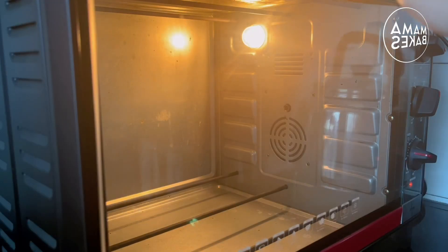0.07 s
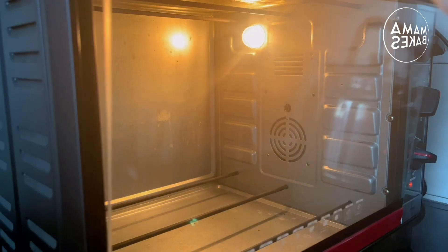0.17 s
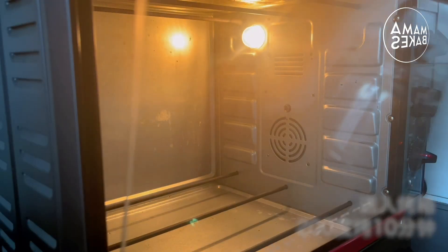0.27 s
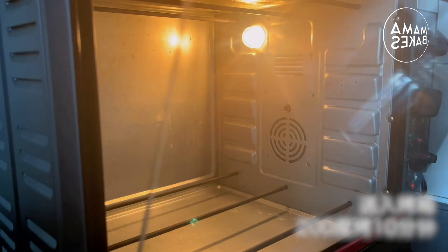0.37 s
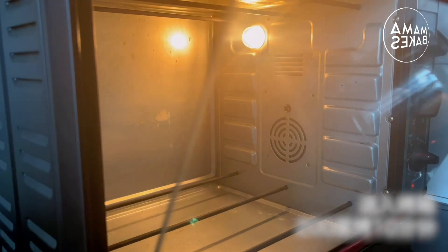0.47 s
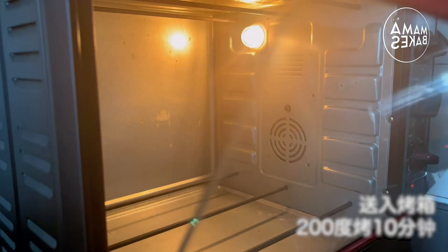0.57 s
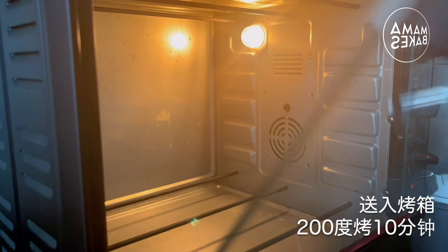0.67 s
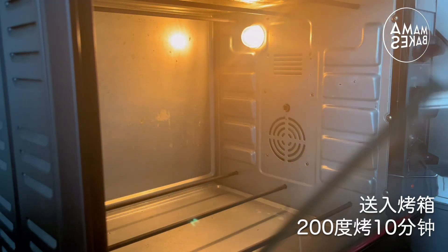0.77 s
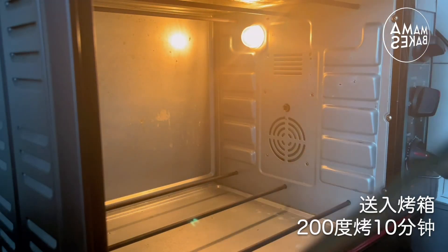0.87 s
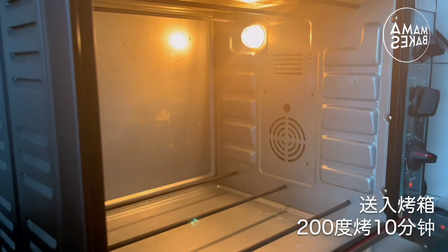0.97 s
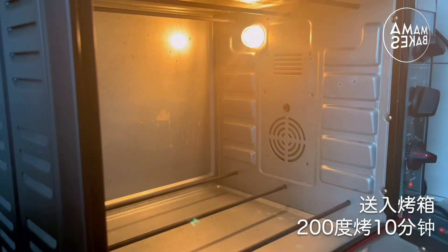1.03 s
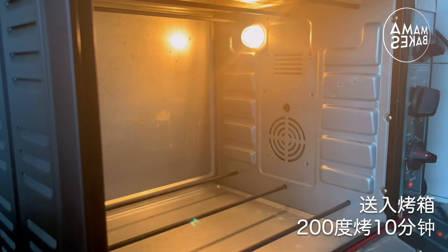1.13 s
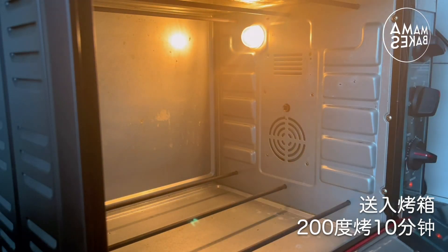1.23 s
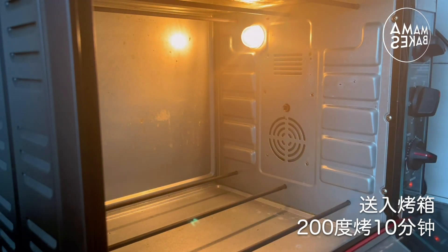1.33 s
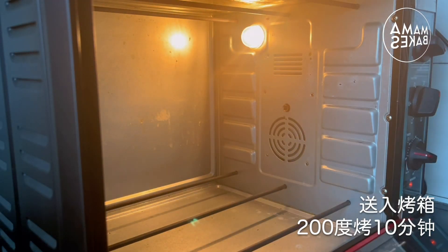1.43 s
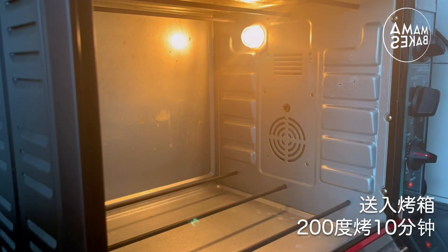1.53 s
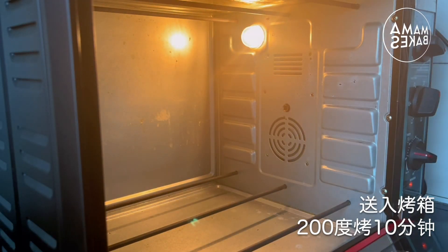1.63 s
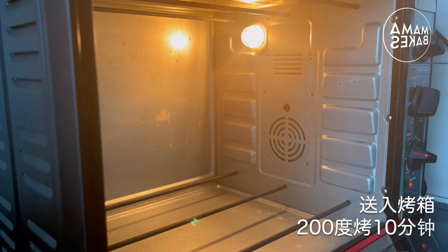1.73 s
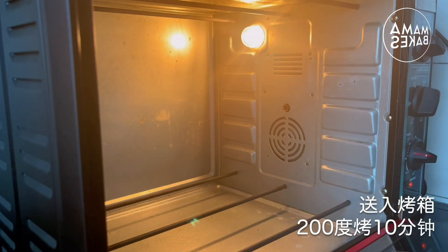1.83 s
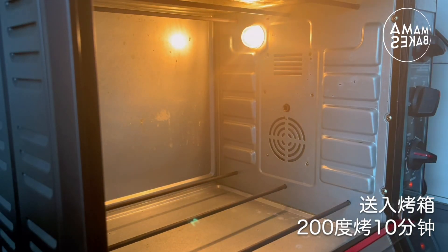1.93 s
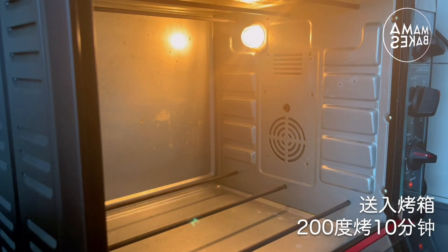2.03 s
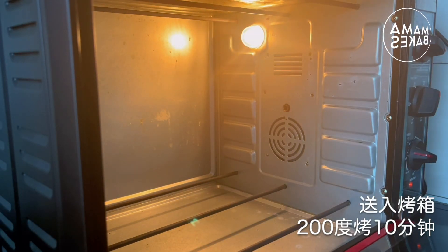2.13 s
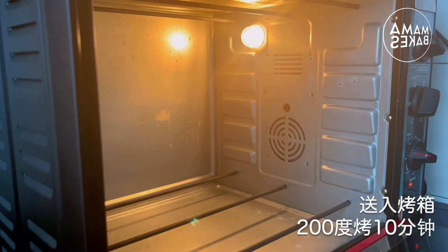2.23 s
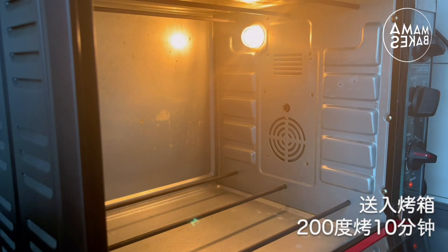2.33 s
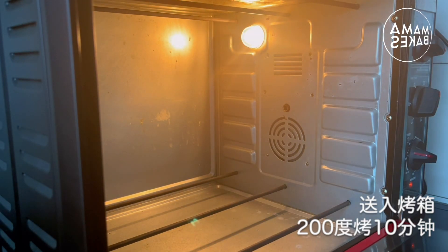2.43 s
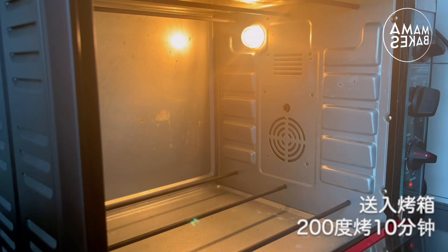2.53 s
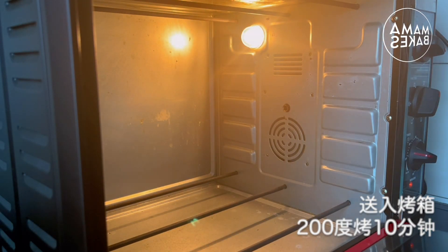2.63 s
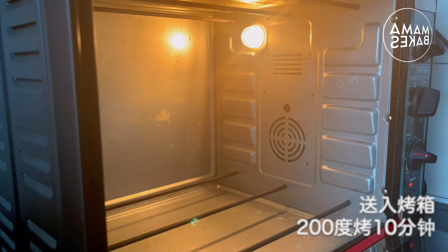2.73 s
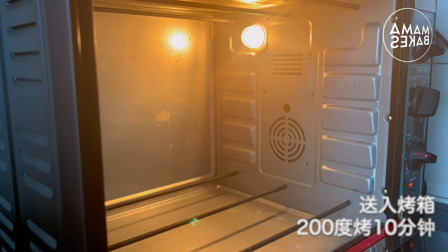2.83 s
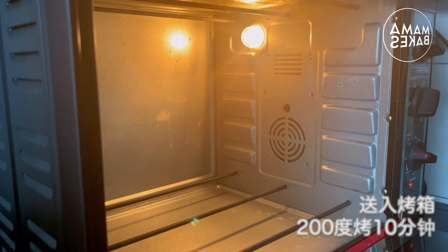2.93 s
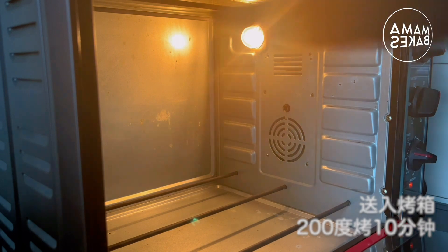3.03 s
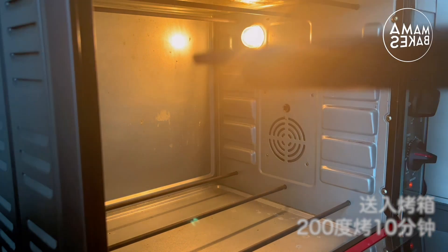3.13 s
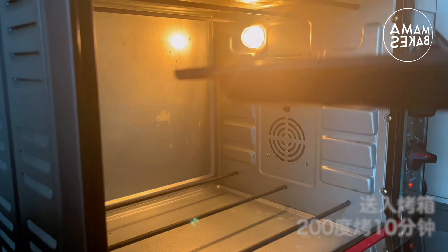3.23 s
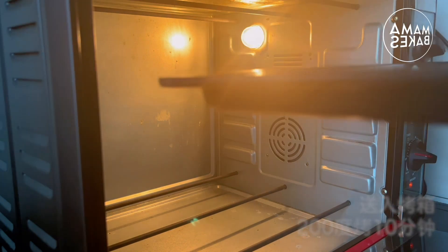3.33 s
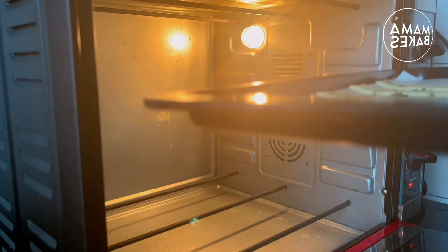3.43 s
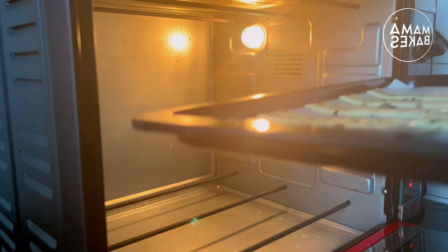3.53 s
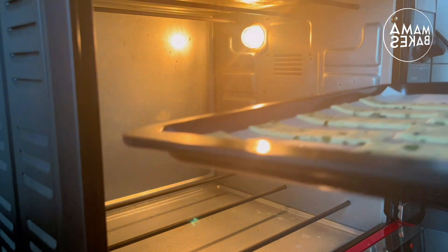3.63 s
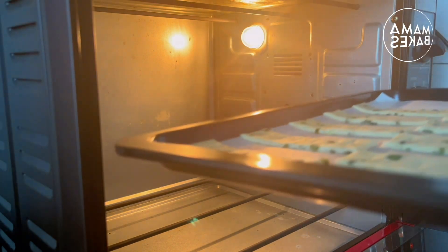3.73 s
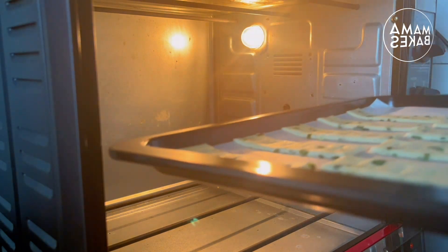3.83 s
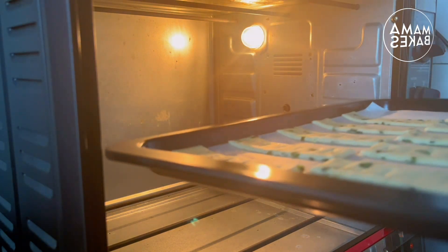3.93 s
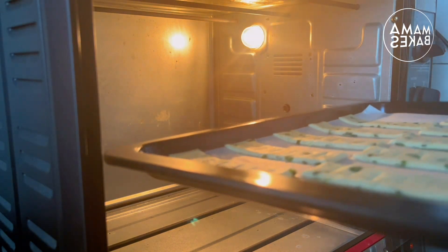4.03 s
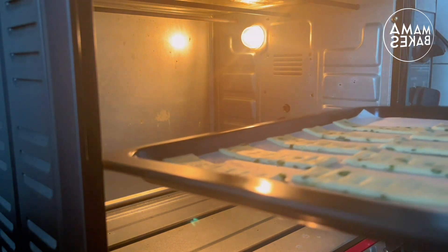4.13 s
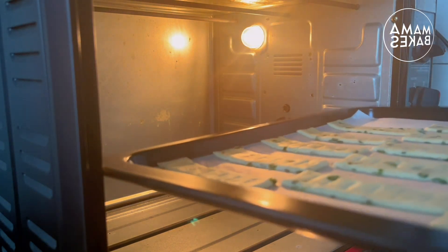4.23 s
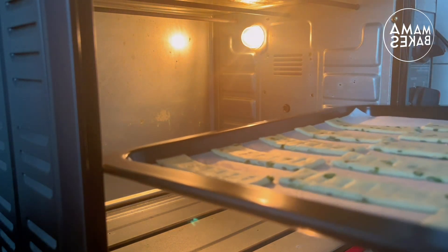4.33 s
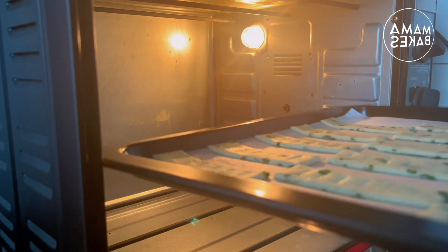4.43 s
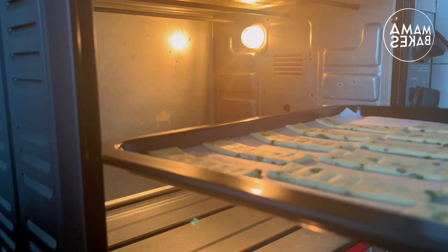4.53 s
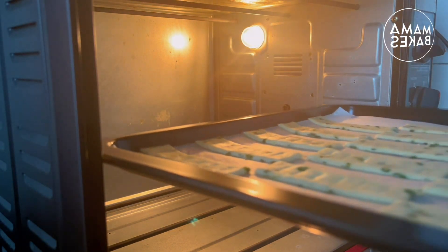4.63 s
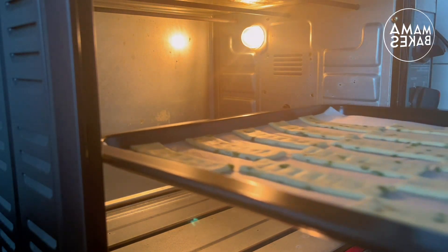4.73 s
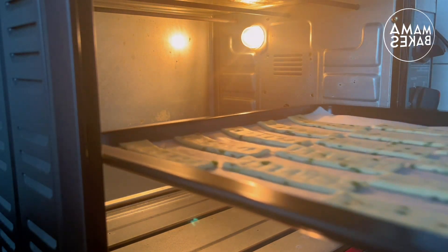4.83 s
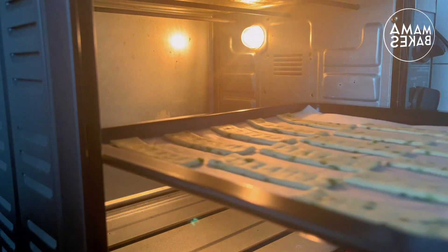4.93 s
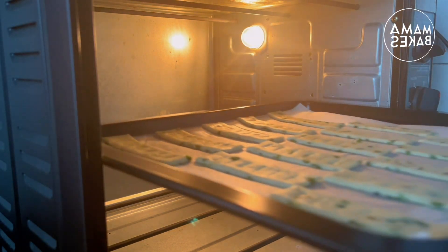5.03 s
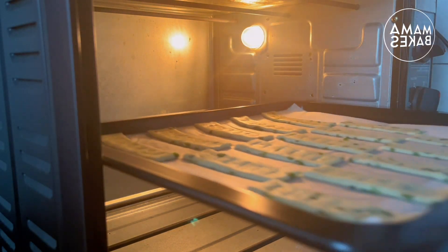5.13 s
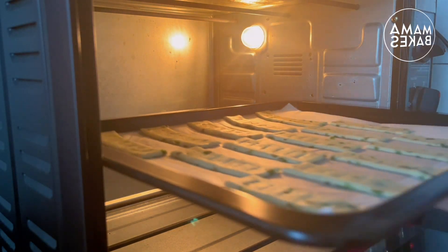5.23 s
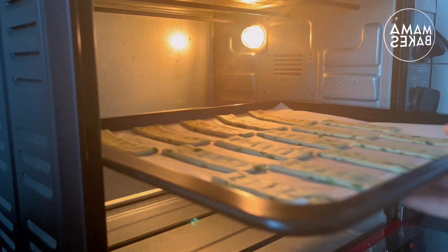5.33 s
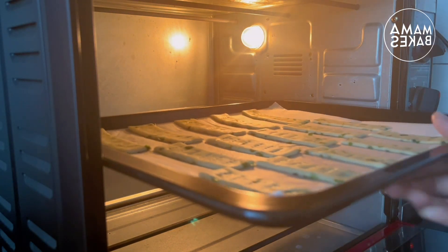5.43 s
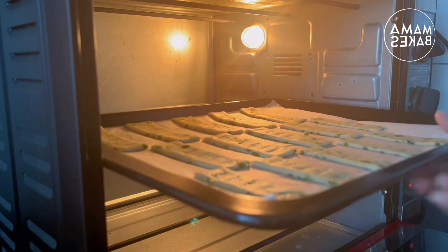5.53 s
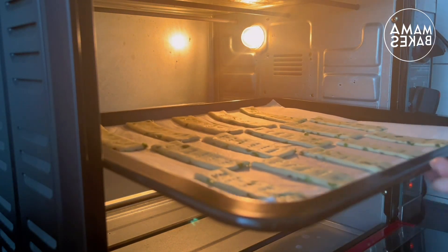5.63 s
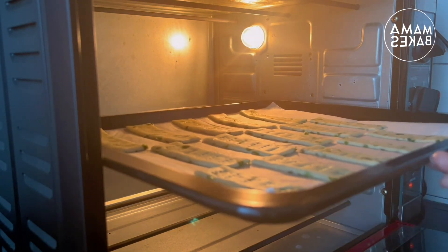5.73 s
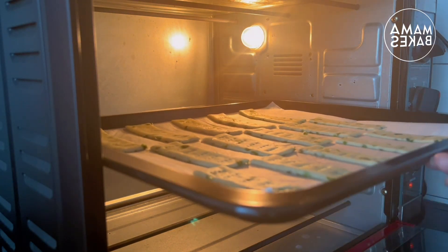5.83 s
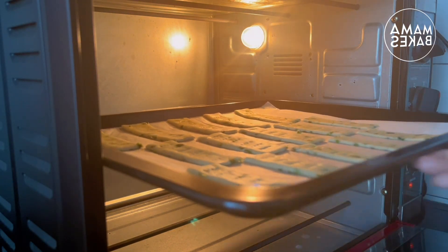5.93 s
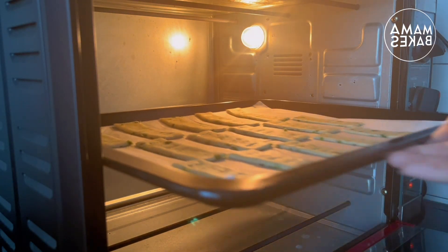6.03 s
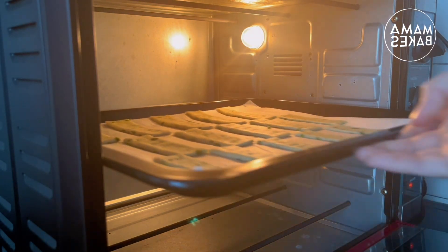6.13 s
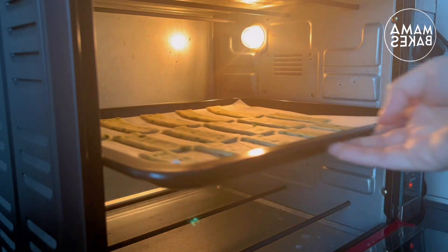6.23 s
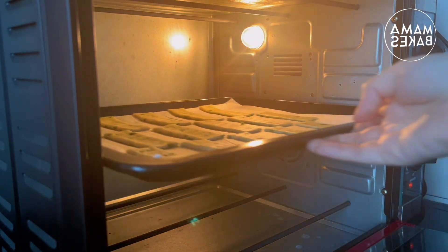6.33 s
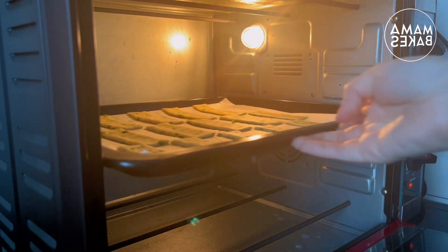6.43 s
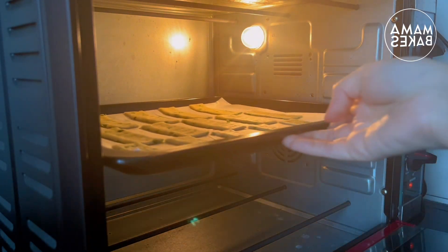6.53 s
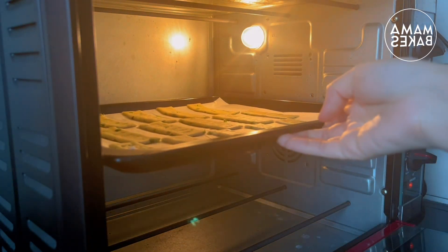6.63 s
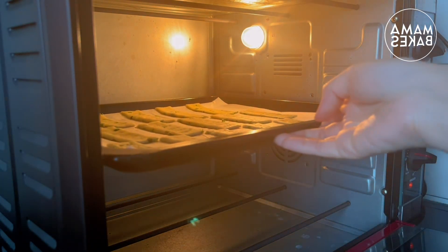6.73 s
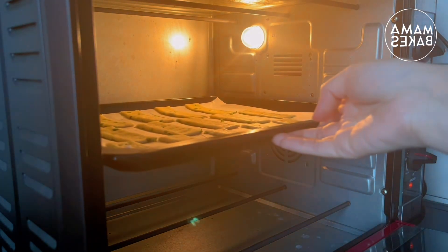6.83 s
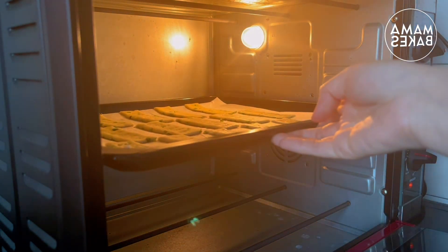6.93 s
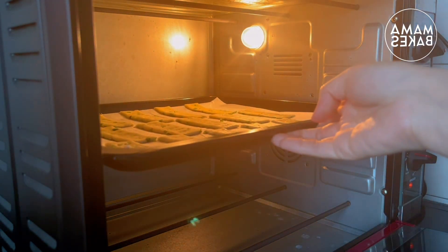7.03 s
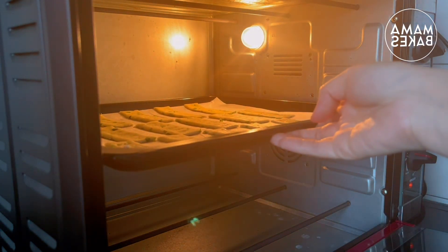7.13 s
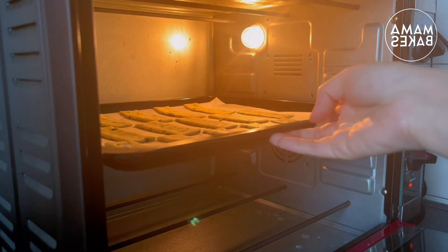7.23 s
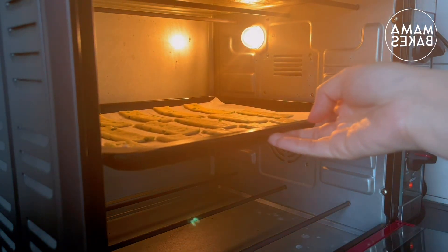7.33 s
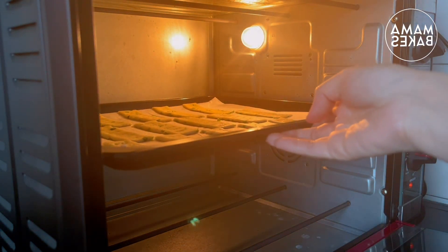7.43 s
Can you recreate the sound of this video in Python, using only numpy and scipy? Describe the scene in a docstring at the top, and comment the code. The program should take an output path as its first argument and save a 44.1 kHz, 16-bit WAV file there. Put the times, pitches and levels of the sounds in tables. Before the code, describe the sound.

In a hard-walled kitchen a clockwork timer ticks steadily while a small oven door clunks open, then a steel tray clatters and scrapes along its rails.

```python
"""A motor hums over room air and a clockwork timer ticks and tocks, four beats a second, in a hard-walled kitchen.
The glass door of a small electric oven drops open in steps: each contact excites steel modes and dense echoes.
A steel tray then lands on the side rails, scrapes in as grains of coloured noise and knocks against them.
The hum is a wavering sine with steady tones; each timer beat is three noise bursts answered by the kitchen."""
import sys
import numpy as np
from scipy import signal
from scipy.fft import rfft, irfft, next_fast_len
from scipy.io import wavfile
from scipy.ndimage import uniform_filter1d, map_coordinates

SR = 44100
rng = np.random.default_rng(int(sys.argv[2]) if len(sys.argv) > 2 else 0)


def store_pcm(level_fs):
    """Save levels as 16-bit WAV."""
    pcm = np.round(np.clip(level_fs, -1, 1) * 32767).astype(np.int16)
    wavfile.write(sys.argv[1], SR, np.atleast_2d(pcm).T)


N = 330309

# Level of the motor's hum. Each row: time in seconds, level in dB.
HUM_LEVEL = [(0.0, -37.5), (0.1, -43), (0.29, -44.5), (0.44, -39), (0.6, -48), (0.71, -39), (1.06, -49),
             (1.11, -43.5), (1.27, -53), (4.25, -53.5), (4.32, -43), (4.42, -52), (4.55, -41.5),
             (4.73, -54), (4.84, -48), (4.96, -52), (5.09, -79), (5.19, -55), (5.36, -47), (5.44, -55),
             (5.94, -60.5), (6.09, -77), (6.2, -64), (6.28, -78.5), (7.49, -79.5)]
# Steady faint tones. Each row: frequency in Hz, level in dB rms.
STEADY_TONES = [(98, -99), (135.5, -95), (200, -87.5), (400, -106.5), (1199, -91.5)]
# Spectral density of the room air before its level curve. Each row: frequency in Hz, level in dB per Hz.
AIR_COLOUR = [(20, -110), (60, -116), (90, -116), (180, -116), (300, -125), (550, -122), (1200, -124),
              (2500, -131), (4500, -134), (4900, -124), (6000, -126), (7000, -140), (11000, -134),
              (13000, -150)]
# Level added to the room air. Each row: time in seconds, gain in dB.
AIR_LEVEL = [(0, 8.5), (2.4, 5.5), (2.55, 14.5), (2.95, 10.5), (3.1, 6.5), (6, 10.5), (6.5, 6.5), (7.49, 6)]
# Decay of the kitchen's echoes. Each row: frequency in Hz, time to fall by 60 dB in seconds.
KITCHEN_DECAY = [(100, 1), (300, 0.5), (800, 0.94), (2000, 0.5), (5000, 0.27), (12000, 0.2)]
# Correlation of left and right where noises are spread. Each row: frequency in Hz, likeness from 0 to 1.
LIKENESS = [(60, 0.55), (150, 1), (380, 0.67), (950, 0.13), (2380, 0.61), (5980, 0.13), (12000, .2)]

# Relative spectrum of the timer's click. Each row: frequency in Hz, level in dB.
CLICK_COLOUR = [(1530, -63), (2600, -35.5), (2840, -39), (3150, -18.5), (4610, -23), (4960, -10.5),
                (7470, -9), (7980, 0), (8530, -16), (9450, -7.5), (11700, -13), (15000, -47.5)]
# Two overlapping stretches of the timer's beat. Each row: first tick in seconds, tick to tick in seconds,
# number of ticks, level in dB before a common gain, drift in dB per second.
BEATS = [(0.177, .4958, 6, -42, 0.94), (2.4746, .4943, 11, -44.5, -0.14)]
TOCK_DELAY_S, TOCK_DB = 0.2375, -6  # the tock relative to its tick
TICK_BODY_DB, TOCK_BODY_DB = -6.5, -13.5  # added to the click's colour below 8 kHz

# Relative spectrum of rim on rail, before its tilt. Each row: frequency in Hz, level in dB.
RASP_COLOUR = [(240, -64), (400, -36), (512, -13.5), (723, -17), (983, -7.5), (1290, -6), (2330, -3),
               (6970, -14.5), (7600, -17.5), (9880, -58.5), (16700, -120)]
# Relative spectrum of the high friction hiss. Each row: frequency in Hz, level in dB.
FIZZ_COLOUR = [(7000, -31.5), (8000, -6.5), (12100, -0.5), (12500, -32), (14300, -27), (15000, -59.5)]
# Relative spectrum of the cabinet's rumble. Each row: frequency in Hz, level in dB.
RUMBLE_COLOUR = [(70, -42), (100, -15.5), (147, 0.5), (170, -16), (190, -35)]
# Strokes of the tray on the rails. Each row: start in seconds, rise in seconds, hold in seconds,
# rasp level in dB, fizz level in dB, rumble level in dB, rasp centre in Hz.
STROKES = [(4.175, .1, 0.014, -48, -64.5, -39, 1750), (4.33, .06, 0.091, -41, -49.5, -54.5, 2200),
           (4.6, .11, 0.05, -42.5, -45.5, -55.5, 2860), (4.723, 0.028, 0.22, -41.5, -50, -51.5, 1615),
           (5.052, 0.079, 0.067, -55.5, -51, -47, 2850), (5.3, 0.024, 0.093, -76, -57.5, -62, 2527),
           (5.5, .05, .1, -82, -68.5, -74, 2500), (5.706, .08, 0.067, -50, -65.5, -61, 2000),
           (5.857, 0.089, 0.042, -59, -52.5, -46.5, 1623), (6.008, .1, 0.061, -30.5, -44, -48.5, 2069),
           (6.212, 0.048, 0.11, -39.5, -46.5, -58, 2150)]
SWELL_DB, FADE_DB_PER_S = 25, 109  # a stroke's swell during its rise, its decay after the hold

# Frequency bands that answer a blow: clank, floor thud, boom, cabinet, door, pan, shelf, rails, rim,
# sheen, fizz. Each row: lower edge in Hz, upper edge in Hz.
PARTS = [(2300, 4500), (70, 132), (132, 180), (180, 320), (320, 440), (460, 640), (660, 840), (860, 1280),
         (1400, 2300), (4500, 7500), (9500, 12500)]
# For each part, the contact column that drives it: 0 clank, 1 floor, 2 cabinet, 3 trays and rails, 4 sheen.
PART_GROUP = [0, 1, 1, 2, 2, 3, 3, 3, 0, 4, 4]
# Modes of cabinet, door and tray. Each row: frequency in Hz, level in dB before a tilt with frequency,
# time in seconds for the slow part of the decay to fall by 60 dB.
STEEL_MODES = [(86, 4, 0.55), (114, 6, 0.34), (143.93, 4.5, 0.5), (208.6, 2, 0.44), (257.3, -2, 0.39),
               (280.8, 3, 0.34), (328.5, -4, 0.58), (391.3, 6, 0.59), (461, -5, 0.58), (515, -0.5, 0.63),
               (550, -4.5, 0.55), (495, -3, 0.29), (907, -6, 0.44), (1003, -8.5, 0.29), (1141, -4.5, 0.38),
               (1170, -9, 0.46), (1484, -7.5, 0.4), (1574, -14.5, 0.57), (1775, -14.5, 0.29),
               (1938, -14, 0.53)]
# Hills and valleys of the cabinet's dense modes. Each row: frequency in Hz, gain in dB.
CABINET_COLOUR = [(150, 2.5), (178, -9.5), (210, -2), (590, -3.5), (760, -3.5), (900, -2), (1200, -3.5),
                  (1340, -5), (1650, -1.5), (2300, 0), (3100, -0.5), (4400, -4), (6000, -8), (7500, -8.5)]
# Contacts of the door, of the tray, and faint knocks while the two stretches of ticking overlap.
# Each row: time in seconds, clank level in dB before the answers below and a common gain, then dB above it
# of floor, cabinet, trays and rails, and sheen, frequency in Hz of the part struck most directly,
# peak of its extra ring in dB.
DOOR_CONTACTS = [(0.3312, -45, -2.5, -0.5, -15.5, 11, 5940, 3.3),
                 (0.3616, -44.5, -14, -20, -31, 13, 380, 23), (0.4677, -63.5, -5, -0.5, -28, -24, 250, 7),
                 (0.672, -29, -45, -44.5, -36, -11.5, 1200, 28),
                 (1.0742, -42.5, -7.5, -25, -3.5, -22.5, 1680, 11),
                 (1.562, -27.5, -22, -25.5, -18, -17, 1124, 19.8)]
TRAY_CONTACTS = [(4.0357, -21.5, -14, -3.5, -9.5, -9.5, 1650, 7.6),
                 (4.1932, -14, -28.5, -12.5, -20, -15.5, 250, 5),
                 (4.2256, -14, -22, -15.5, -6.5, -8.5, 100, 17),
                 (4.2488, -15.5, -17.5, -1, -7, -14, 1700, 13),
                 (4.2702, -18.5, -9.5, -8, -11, -7.5, 250, 5), (4.3784, -24.5, -16, -0.5, -12, -2, 556, 7),
                 (4.781, -20, -9.5, -24.5, -9.5, -12, 1070, 11.8),
                 (4.8385, -27, -8, -12, -3, -10.5, 1050, 13.5),
                 (5.1876, -34.5, -12, -16.5, -20.5, 1.5, 545, 11),
                 (5.5745, -32.5, -23, -34, -43.5, -20.5, 550, 12),
                 (5.7211, -12, -34.5, -17, -13.5, -3.5, 11000, 11),
                 (5.7892, -27, -20.5, -3.5, -7, -3.5, 100, 8),
                 (6.0599, -25.5, -27, -23.5, -27, -24.5, 155, 9),
                 (6.2745, -15, -27.5, -11.5, -22, -20, 380, 12.2)]
FAINT_CONTACTS = [(2.4962, -77, -17, -15, -2, 0, 1080, 16), (2.591, -73, -19, 3.5, -4, -11, 335, 21.7),
                  (2.7817, -79, 1, -1, -3, -2, 546, 12)]
# Answer of each part within its group, for door and tray. Each entry: gain in dB.
DOOR_ANSWER = [0.5, 2.5, -32.5, -0.8, -11, 2.3, -18.5, -9, -6, 0.8, 5]
TRAY_ANSWER = [-3.5, -2.5, 1.3, -0.26, -17, -0.06, 1, -2.1, -6, 1.14, -8.5]
DOOR_SHIFT_DB, DOOR_RISE_S = 1.155, 0.00097  # left up and right down by the shift; onset time
TRAY_SHIFT_DB, TRAY_RISE_S = 0.99, 0.0022
RATTLE_DB, RATTLE_GROWTH = 5, 0.17  # drive of the chatter for a -29.5 dB contact; dB more per dB of contact
STRUCK_OCTAVES = 0.22  # reach of the extra ring
ECHO_SWELL_CYCLES = 6  # the cabinet's echoes build up over this many cycles

# Gain of the left-right contrast. Each row: frequency in Hz, gain in dB.
CONTRAST = [(7000, 0.5), (8500, 1), (10800, -4), (11500, -34.5), (13000, -26.5), (14000, 2.5)]
TOP_HZ = 15780


def amp(db):
    """Level law: 20 dB is a factor of ten in amplitude."""
    return 10 ** (np.asarray(db) / 20)


def unit(x):
    """Normalisation to an rms amplitude of 1."""
    return x / np.sqrt(np.mean(x ** 2) + 1e-20)


def along(points, hz):
    """Interpolation of (Hz, value) points on a logarithmic frequency axis."""
    f, v = np.transpose(points)
    return np.interp(np.log(hz + 1), np.log(f + 1), v)


def curve(rows):
    """Linear interpolation of (seconds, value) rows at every sample."""
    s, values = np.transpose(rows)
    return np.interp(np.arange(N) / SR, s, values)


def wobble(rate):
    """Slow random modulation: a smooth curve through rate random knots a second."""
    knots = rng.standard_normal(int(N * rate / SR) + 4)
    return map_coordinates(knots, [np.arange(N) * rate / SR])


def filtered(x, response):
    """Linear filtering: the spectrum is multiplied by a response of frequency."""
    m = next_fast_len(x.shape[-1] + 4096)
    spectrum = rfft(x, m) * response(np.fft.rfftfreq(m, 1 / SR))
    return irfft(spectrum, m)[..., :x.shape[-1]]


def spread(pair, points):
    """Partial coherence: two unrelated signals are coloured, then mixed into partly alike left and right."""
    def response(hz):
        angle = np.arccos(np.clip(along(LIKENESS, hz), -1, 1)) / 2
        return amp(along(points, hz)) * [np.cos(angle), np.sin(angle)]
    mid, side = filtered(pair, response)
    return np.array([mid + side, mid - side])


def kitchen_tail(size, cycles=0):
    """Reverberation: two noises whose every frequency builds up and decays at its own rate."""
    hz, t, z = signal.stft(rng.standard_normal((2, size)), SR, nperseg=256)
    hz = hz[:, None]
    decay = amp(-60 * t / along(KITCHEN_DECAY, hz))
    build_up = 1 - np.exp(-(t + 0.003) * hz / (cycles + 0.01))
    return signal.istft(z * decay * build_up, SR, nperseg=256)[1][:, :size]


def add(out, s, sound):
    """Superposition: mixes a sound in at s seconds."""
    at = round(s * SR)
    out[:, at:at + sound.shape[1]] += sound


def room_air():
    """Broadband noise: a steady colour under a varying level."""
    air = spread(rng.standard_normal((2, N)), AIR_COLOUR) * np.sqrt(SR / 2)
    return air * amp(curve(AIR_LEVEL) + 0.64 * wobble(5.8))


def motor_hum():
    """Modulated oscillation: a low tone swells and wavers in pitch, with low noise and steady tones."""
    t, hum_db = np.arange(N) / SR, curve(HUM_LEVEL)
    cycles = np.cumsum(49 + 0.5 * wobble(2)) / SR
    low = amp(hum_db + 1.3 * wobble(11.0)) * np.sqrt(2) * np.sin(2 * np.pi * cycles)
    low_noise = filtered(rng.standard_normal(N), lambda hz: np.exp(-((hz - 42) / 14) ** 2))
    shake = amp(hum_db - 25.5) * unit(low_noise)
    tones = sum(amp(db + 0.8 * wobble(2.7)) * np.sqrt(2) * np.sin(2 * np.pi * (hz * t + rng.random()))
                for hz, db in STEADY_TONES)
    return (low + shake + tones) * amp([[0.3], [-0.3]])


def ticks():
    """Periodic escapement: tick and weaker tock, uneven in level, as (seconds, dB, body dB)."""
    rows = []
    for first, gap, count, db, drift in BEATS:
        for k in range(round(count)):
            for late, less, body_db in [(0, 0, TICK_BODY_DB), (TOCK_DELAY_S, TOCK_DB, TOCK_BODY_DB)]:
                level = db + drift * k * gap + less + rng.normal(0, 0.8)
                rows.append((first + k * gap + late, level, body_db))
    return [row for row in rows if row[0] < N / SR]


def timer():
    """Repeated impact: the escapement strikes three times within 6 ms and the kitchen answers."""
    out, t = np.zeros((2, N + SR)), np.arange(SR // 4) / SR
    for s, db, body_db in ticks():
        strikes = sum(amp(level - 60 * (t - at) / 0.09) * (t >= at)
                      for at, level in [(0, -8.5), (0.003, -10.5), (0.006, -11)])
        sound = strikes * rng.standard_normal((2, len(t))) + amp(2.5) * kitchen_tail(len(t))
        colour = [(hz, level + (body_db if hz < 8000 else 0)) for hz, level in CLICK_COLOUR]
        add(out, s, amp(db + 5.0) * spread(sound, colour))
    return out[:, :N]


def strokes():
    """Addition of powers: strokes swell, hold and fade into gains of rasp, fizz, rumble, and a rasp centre."""
    start, rise, hold, *levels, hz = np.transpose(STROKES)[:, :, None]
    steps = np.arange(0, N, 64)
    t = steps / SR - start
    swell_db = SWELL_DB * np.minimum(t / rise - 1, 0)
    fade_db = FADE_DB_PER_S * np.maximum(t - rise - hold, 0)
    power = amp(2 * (swell_db - fade_db)) + 1e-30
    gains = [np.sqrt((power * amp(2 * db)).sum(axis=0)) for db in levels]
    # the centre is a mean weighted by rasp power
    centre = (power * amp(2 * levels[0]) * hz).sum(axis=0) / gains[0] ** 2
    return [np.interp(np.arange(N), steps, c) for c in (*gains, centre)]


def tray_slide():
    """Friction: rim on rail gives dense uneven grains, filtered by the tray; the cabinet rumbles along."""
    rasp_gain, fizz_gain, rumble_gain, centre_hz = strokes()
    grains = rng.standard_normal((2, N)) * amp(1.5 * wobble(30) + 2.8 * wobble(400))
    # the rasp leans from a dull to a bright colour as the contact moves along the rim
    brightness = np.clip((centre_hz - 1200) / 3300, 0, 1)
    dull, sharp = (unit(spread(grains, [(hz, db + tilt * np.log2(hz / 2300)) for hz, db in RASP_COLOUR]))
                   for tilt in (-4, 4))  # dB per octave
    modes_db = 3 * unit(uniform_filter1d(rng.standard_normal(400), size=2))
    through_tray = lambda hz: amp(np.interp(hz, np.linspace(0, 8000, len(modes_db)), modes_db) - 2)
    rasp = filtered((1 - brightness) * dull + brightness * sharp, through_tray)
    rasp = rasp * rasp_gain * amp([[1.5], [-1.5]])
    fizz = unit(spread(grains * rng.standard_normal((2, N)), FIZZ_COLOUR)) * fizz_gain
    return rasp + fizz + unit(spread(grains, RUMBLE_COLOUR)) * rumble_gain


def contacts():
    """Impact strengths: (seconds, dB, dB of each part, struck Hz, extra dB, shift dB, rise s) per contact."""
    kinds = [(DOOR_CONTACTS, DOOR_ANSWER, DOOR_SHIFT_DB, DOOR_RISE_S),
             (TRAY_CONTACTS + FAINT_CONTACTS, TRAY_ANSWER, TRAY_SHIFT_DB, TRAY_RISE_S)]
    return [(s, db, np.array([0, *groups])[PART_GROUP] + answer, hz, extra_db, shift_db, rise_s)
            for rows, answer, shift_db, rise_s in kinds
            for s, db, *groups, hz, extra_db in rows]


def steel_ring(t):
    """Modal superposition: damped modes with new strengths and phases; loose panels make each waver."""
    ring = 0
    for hz, db, t60 in STEEL_MODES:
        decay = amp(-60 * t / t60) + 0.5 * amp(-60 * t / (0.19 * t60))
        swell = 1 - np.exp(-t * hz / 4)  # low modes take longer to build up
        strength = amp(db + rng.normal(0, 1.5)) * np.sqrt(hz / 300)
        waver = 0.06 * np.cumsum(rng.standard_normal(len(t) // 16 + 1)).repeat(16)[:len(t)]
        turns = hz * t + rng.random() + np.array([[0], [1 / 4]])  # the pair is a quarter cycle apart
        ring = ring + strength * decay * swell * np.sin(2 * np.pi * turns + waver * np.sqrt(hz / 600))
    return ring


def loose_rattle(t, db, rise_s):
    """Intermittent contact: loose parts chatter in uneven, fast-dying spikes, more so for hard blows."""
    rattle_db = RATTLE_DB + RATTLE_GROWTH * (db + 29.5)
    chatter = amp(3.5 * np.repeat(rng.standard_normal(len(t) // 100 + 1), 100)[:len(t)])
    return amp(rattle_db - 60 * (t - rise_s) / 0.17) * chatter * rng.standard_normal((2, len(t)))


def blow_colour(parts_db, struck_hz, extra_db):
    """Spectral envelope: band levels, cabinet modes, random high lumps and a peak at the part struck."""
    grid = np.arange(40, 16000, 20)
    lo, hi = np.transpose(PARTS)
    per_hz = parts_db - 10 * np.log10((hi - lo) / SR) - 12.0
    # each band is flat between points a little inside its edges
    inner = sorted([*zip(lo * 1.188, per_hz), *zip(hi / 1.1, per_hz)])
    ends = [(13000, per_hz[-1] - 18), (15500, per_hz[-1] - 40)]
    outline = along([(55, per_hz[1] - 40), *inner, *ends], grid) + along(CABINET_COLOUR, grid)
    # each spot struck favours other groups of the dense high modes
    lumps = 2.86 * unit(uniform_filter1d(rng.standard_normal(len(grid)), size=8)) * (grid > 2000)
    struck = extra_db * np.exp(-(np.log2(grid / struck_hz) / STRUCK_OCTAVES) ** 2)
    return np.transpose([grid, outline + lumps + struck])


def knocks():
    """Impact excitation: each contact rings the steel, rattles loose parts and fills the kitchen with echoes."""
    out, lead, t = np.zeros((2, N + SR)), 1024, np.arange(SR * 3 // 4) / SR
    # low down the single modes stand out: few echoes fill the valleys between them
    valleys = lambda hz: amp(along([(150, -3.5), (1200, 0.0), (1600, -1.0)], hz))
    for s, db, parts_db, struck_hz, extra_db, shift_db, rise_s in contacts():
        ring = steel_ring(t)
        echoes = filtered(kitchen_tail(len(t), ECHO_SWELL_CYCLES), valleys)
        rattle = filtered(loose_rattle(t, db, rise_s), valleys)
        onset = np.minimum(t / rise_s, 1) ** 2
        # the echoes die 20 dB per second faster than the kitchen alone
        sound = (amp(-14.5) * ring + echoes * amp(-20 * t) + 0.5 * rattle) * onset
        sound = np.pad(sound, ((0, 0), (lead, 0)))  # room for the filter to spread ahead of the onset
        coloured = spread(sound, blow_colour(db + parts_db, struck_hz, extra_db))
        add(out, s - lead / SR, coloured * amp([[shift_db], [-shift_db]]))
    return out[:, :N]


def scene():
    """Superposition of all sources in the kitchen."""
    return room_air() + motor_hum() + timer() + tray_slide() + knocks()


def record(dry):
    """Sum and difference filtering: the sum has a gap near 8.6 kHz and a dull top, the contrast its own colour."""
    def sum_gain(hz):
        gap_db = -30 * np.exp(-((hz - 8600) / 900) ** 4)
        return amp(gap_db + along([(12300, -0.5), (12600, -2), (14500, -4.5), (15000, -17.0)], hz))

    def response(hz):
        return np.array([sum_gain(hz), amp(along(CONTRAST, hz))]) * (hz < TOP_HZ)  # nothing passes the limit
    pair = np.array([dry[0] + dry[1], dry[0] - dry[1]]) / 2
    mid, side = filtered(pair, response)
    return np.array([mid + side, mid - side])


dry = scene()
out = record(dry)
store_pcm(out)
```